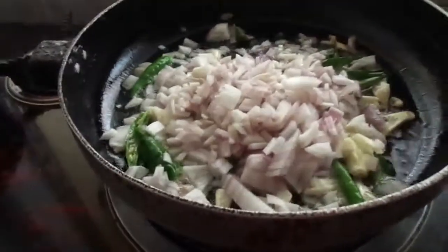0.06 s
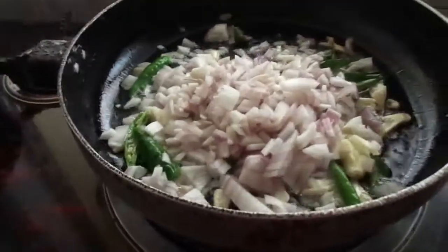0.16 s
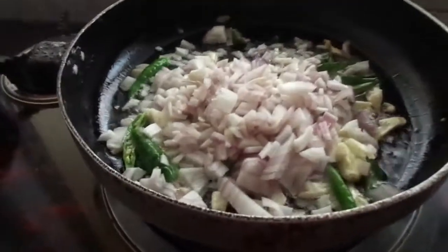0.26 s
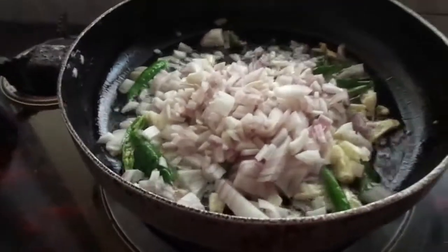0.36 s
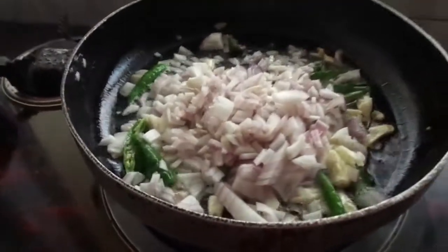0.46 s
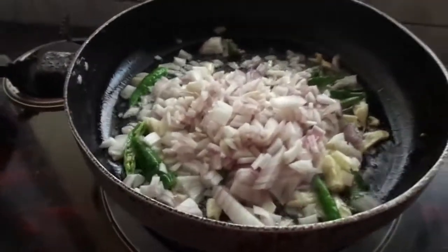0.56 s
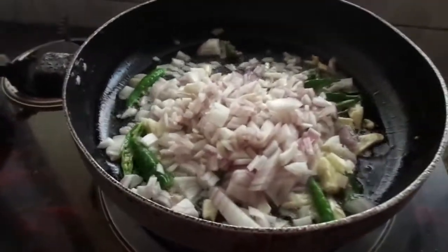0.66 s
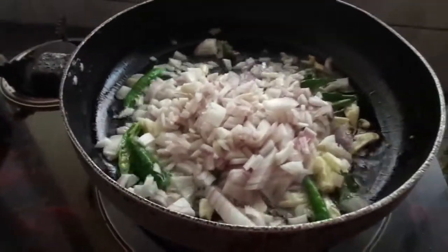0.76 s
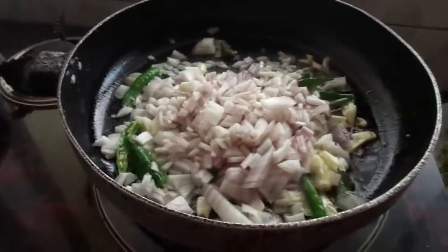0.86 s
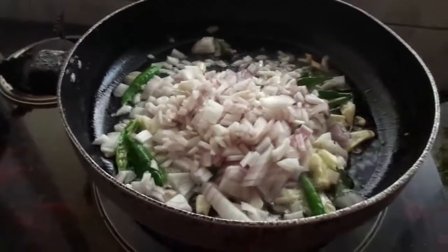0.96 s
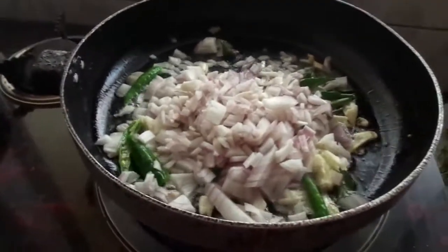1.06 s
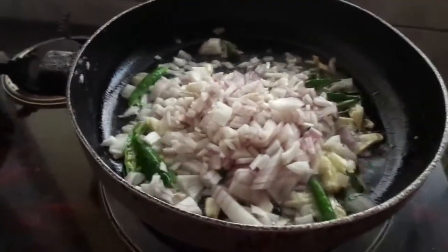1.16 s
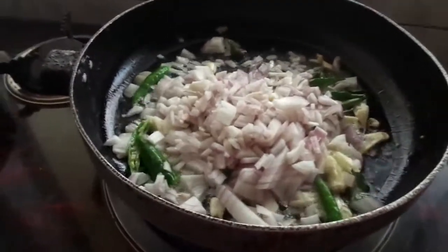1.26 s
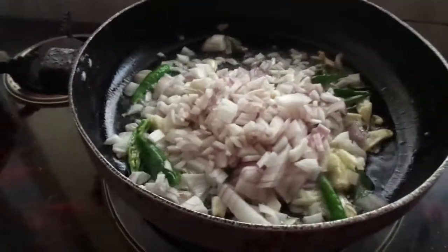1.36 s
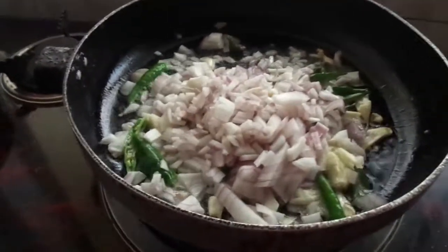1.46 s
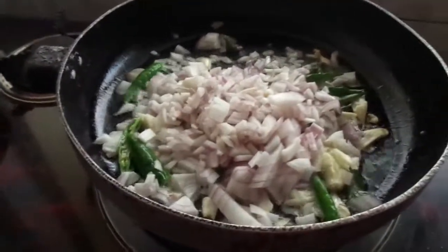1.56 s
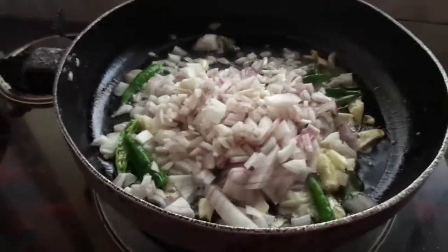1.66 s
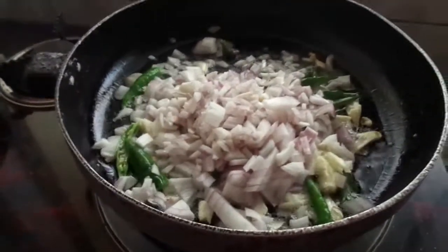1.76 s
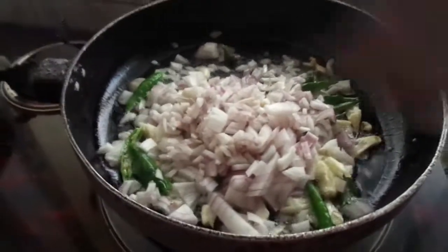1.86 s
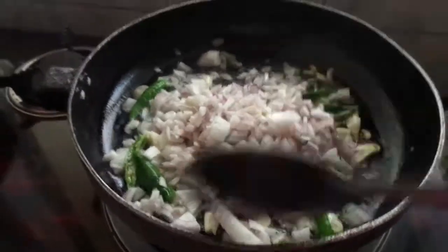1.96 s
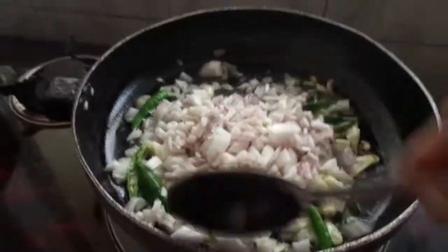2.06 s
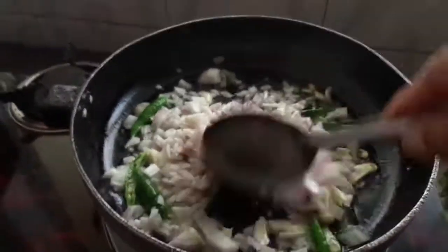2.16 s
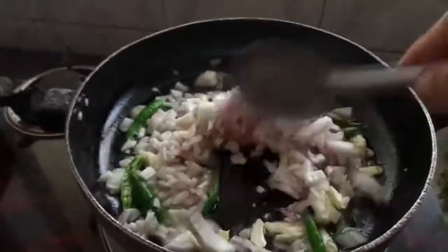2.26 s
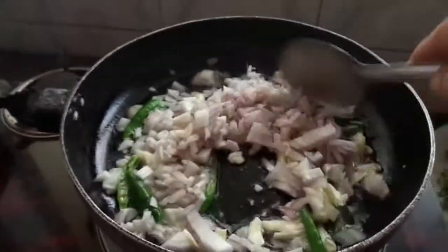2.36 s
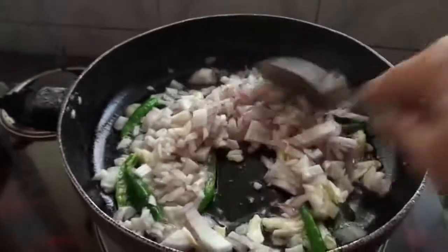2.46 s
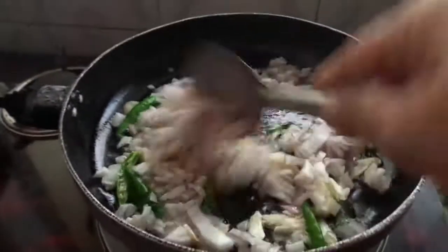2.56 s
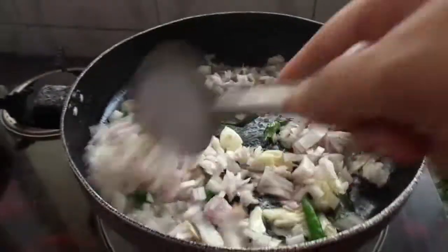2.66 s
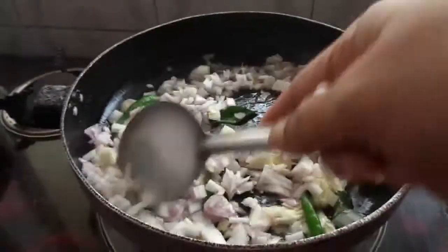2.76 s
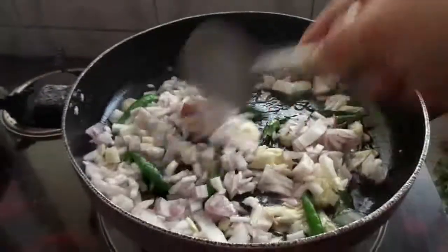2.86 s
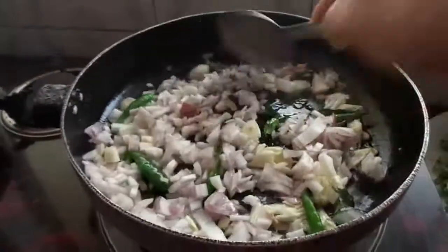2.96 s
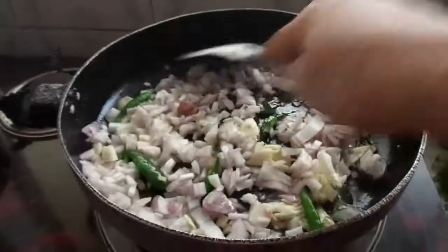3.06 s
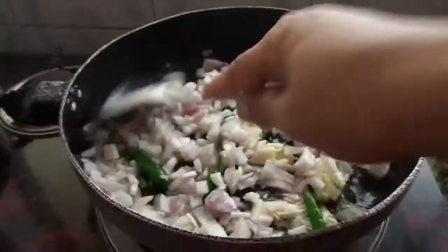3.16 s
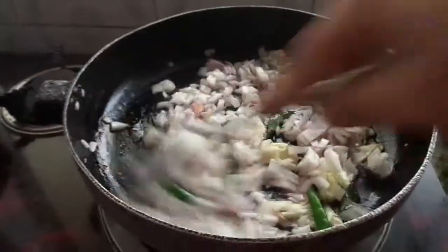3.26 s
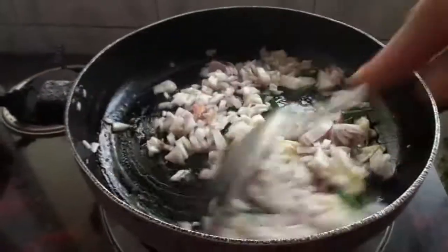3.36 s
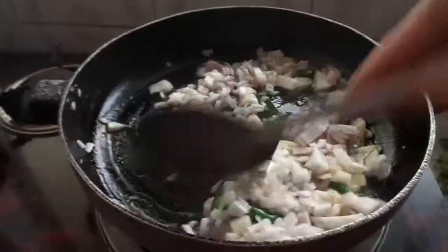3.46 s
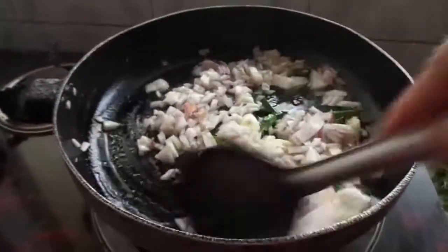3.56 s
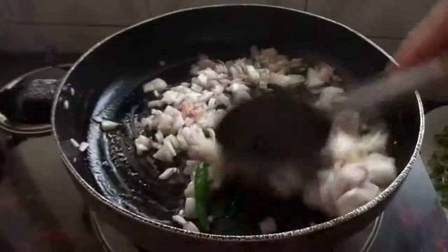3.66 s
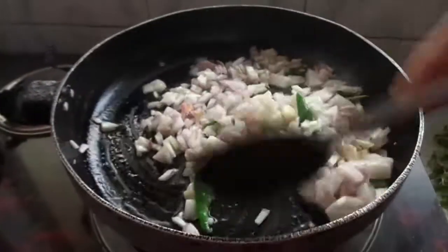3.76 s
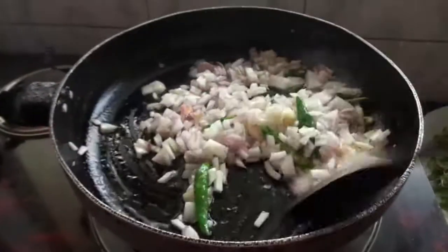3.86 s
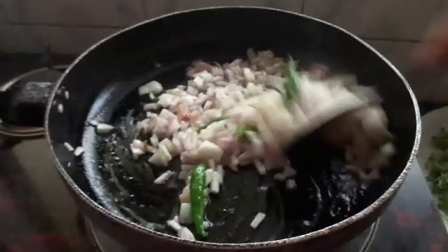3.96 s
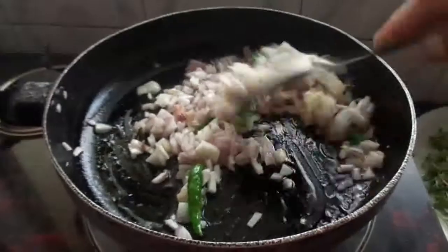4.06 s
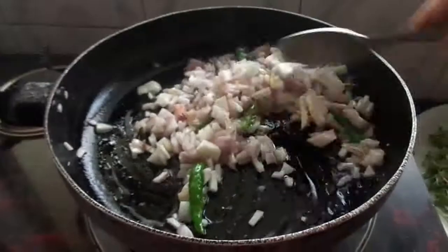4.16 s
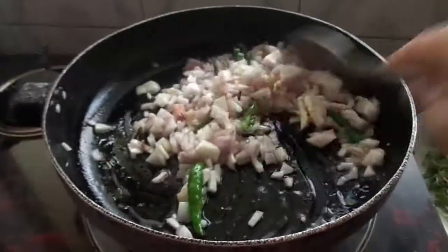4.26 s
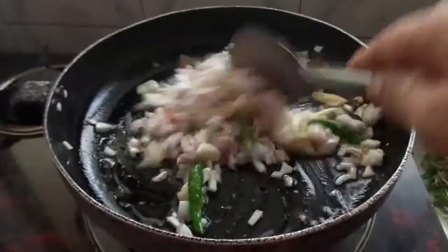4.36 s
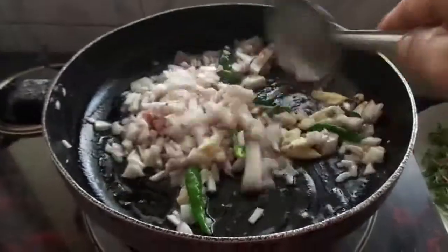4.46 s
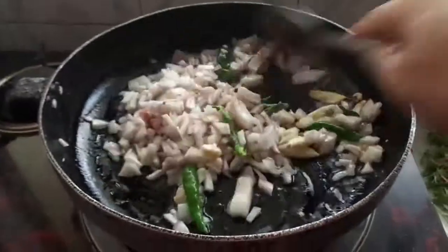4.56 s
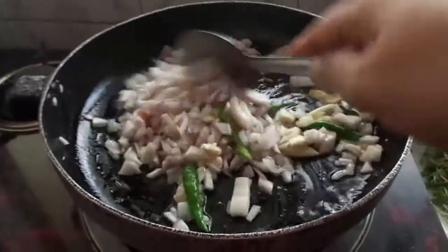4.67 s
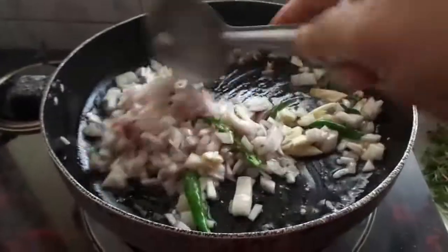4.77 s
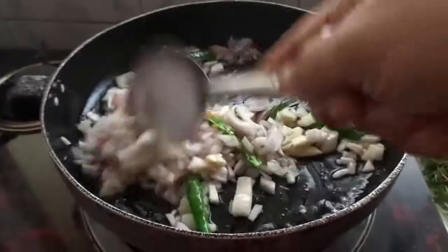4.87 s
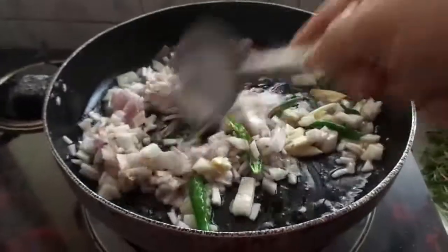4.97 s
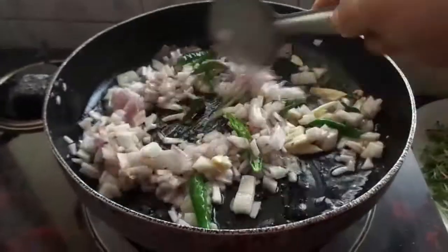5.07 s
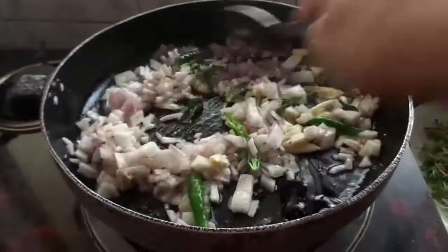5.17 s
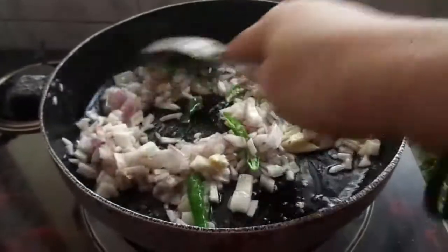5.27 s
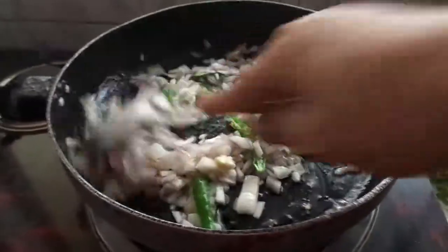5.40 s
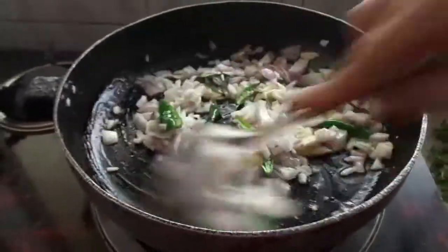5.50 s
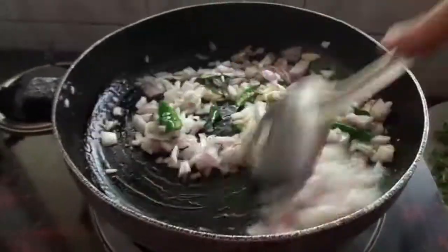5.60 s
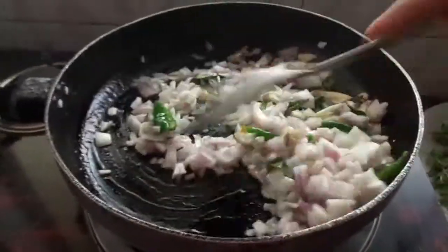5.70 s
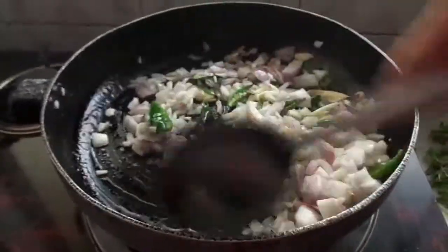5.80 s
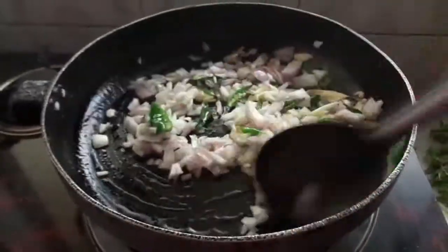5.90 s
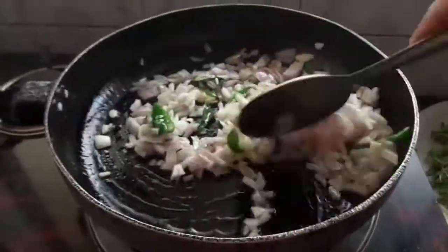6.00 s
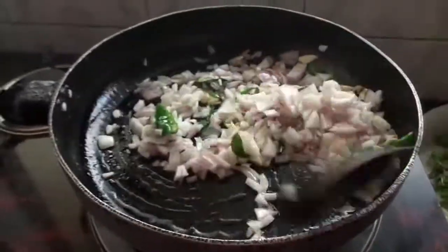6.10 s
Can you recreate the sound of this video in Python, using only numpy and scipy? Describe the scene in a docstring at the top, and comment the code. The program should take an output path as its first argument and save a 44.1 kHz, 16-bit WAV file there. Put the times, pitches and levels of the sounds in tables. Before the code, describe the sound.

From the start, a fine, bright sizzle of onions in hot oil fills the close foreground, with random crackles and sharp drops spitting, notably at 0.2, 0.8 and 1.4 s. Wet pieces slump softly near 0.4 and 1.1 s, with faint trembling steam tones. At 1.2 s a thin steel clink skids and rings briefly. A light ladle tap with a tiny squeak comes at 2.1 s, then a soft scrape at 2.5 s as the sizzle rises. A hard knock at 3.0 s leads into scraping; ringing knocks and gritty strokes follow at 3.5 and 3.8 s. The strongest, raspy stroke lands at 4.6 s, between sharp spits. Knocks at 5.2 and 5.3 s, a squeaky drag to 5.6 s, then softer strokes at 5.8 and 6.1 s with sizzling flares. Low hum, faint rumble and a short kitchen tail lie underneath.

```python
"""A fine, crackling sizzle up close: chopped onions fry in hot oil in a small kitchen.
Random clicks and noise make the sizzle of steam bursts; short snaps make single drops spit.
A steel utensil clinks once, as a skid of noise and dying sines. A ladle knocks on the pan (thud and
ringing modes) and scrapes through the onions (slips that ring it); the stirred oil sizzles harder.
Soft rustles, brief squeaks, a faint rumble and a low hum lie underneath, with a short room tail."""
import sys
import numpy as np
from scipy import signal
from scipy.io import wavfile
from scipy.ndimage import uniform_filter1d

SR = 44100
rng = np.random.default_rng(int(sys.argv[2]) if len(sys.argv) > 2 else 0)


def digitize_waveform(pressure):
    """Quantize a signal to 16-bit integers and store it at the path in sys.argv[1].

    Rows of a 2-D input are taken as channels; values are limited to [-1, 1].
    """
    field = np.atleast_2d(pressure).T
    bounded = np.clip(field, -1, 1)
    quanta = np.round(bounded * 32767).astype(np.int16)
    wavfile.write(sys.argv[1], SR, quanta)


N = 270641
TIME = np.arange(N) / SR
HIT_TIME = np.arange(SR // 2) / SR  # time axis of one short sound (s)


def amp(db):
    """Turns dB into a linear gain."""
    return 10 ** (np.asarray(db) / 20)


def unit(x):
    """Scales to rms 1."""
    return x / np.sqrt(np.mean(x ** 2) + 1e-20)


def read(points, hz):
    """Reads a spectrum on a log-frequency axis."""
    f, value = np.transpose(points)
    return np.interp(np.log(hz + 1), np.log(f + 1), value)


def follow(rows):
    """Gain over time from (s, dB) rows."""
    return amp(np.interp(TIME, *np.transpose(rows)))


def add(mix, s, sound):
    """Mixes a sound in at time s."""
    part = mix[max(round(s * SR), 0):][:len(sound)]
    part += sound[:len(part)]


def impulse(points, size=2048):
    """The causal (minimum-phase) click that has a given spectrum."""
    log_gain = np.log(amp(read(points, abs(np.fft.fftfreq(size, 1 / SR)))))
    return np.fft.ifft(np.exp(np.conj(signal.hilbert(log_gain)))).real


def through(x, response):
    """Passes x through an impulse response."""
    return signal.oaconvolve(x, response)[:len(x)]


def butter(x, order, hz, kind):
    """Rolls x off beyond a cut-off frequency."""
    return signal.sosfilt(signal.butter(order, hz, kind, fs=SR, output="sos"), x)


def resonate(x, hz, width_hz):
    """One resonance of gain 1."""
    return signal.lfilter(*signal.iirpeak(hz, hz / width_hz, SR), x)


def waver(per_s):
    """Random wandering of rms 1: straight lines between per_s random values each second."""
    knots = rng.standard_normal(int(N / SR * per_s) + 2)
    return unit(np.interp(TIME * per_s, np.arange(len(knots)), knots))


def bursts(per_s, spread_db, limit):
    """Random clicks: many small, a few large."""
    size = amp(spread_db * np.minimum(rng.exponential(1, N), limit))
    return size * rng.choice([-1, 1], N) * (rng.random(N) < per_s / SR)


def swells(times, peak_s):
    """One swell per time, shape (times, N): it reaches 1 after peak_s and dies away."""
    age = np.maximum(TIME - np.array(times)[:, None], 0) / peak_s
    return age * np.exp(1 - age)


def ring(modes, hold=1, shape=1):
    """Dying sines; hold scales their ring time and shape their strengths."""
    hz, db, t60 = np.transpose(modes)[:, :, None]
    decay = amp(db - 60 * HIT_TIME / (t60 * hold))
    return (shape * decay * np.sin(2 * np.pi * hz * HIT_TIME)).sum(0)


# how hard the oil fries, calm under the resting heap and livelier once stirred:
# t/s, level/dB (before the sizzle's trim)
FRYING_LEVEL = [(0, -38.5), (.27, -38), (.5, -41.5), (.85, -39), (1.35, -39), (2.05, -41), (2.3, -37.5),
                (2.8, -36), (3.2, -36.5), (4.35, -35), (4.95, -36.5), (5.25, -35), (5.8, -37),
                (6.13, -37.5)]
# colour of the sizzle: f/Hz, level per Hz/dB
SIZZLE_COLOUR = [(50, -28), (150, -28), (300, -8.5), (600, -1), (900, 0), (1170, 1.5), (1350, 7),
                 (1560, 3.5), (2400, 1), (3800, 2.5), (6000, 1), (9000, 0), (12400, 0)]


def sizzle():
    """Steam bubbles burst: a fine fizz, short pitched ticks and broad crackles, all in little flurries."""
    ticks = np.zeros(N)
    for hz in np.geomspace(1200, 12000, num=16):
        clicks = bursts(per_s=110, spread_db=4.5, limit=5.02)
        ticks += unit(resonate(clicks, hz, width_hz=hz * 0.34)) * np.sqrt(hz)
    crackles = bursts(per_s=1500, spread_db=1, limit=5.4)
    fizz = rng.standard_normal(N)
    oil = amp(-5.5) * unit(ticks) + amp(-6.5) * unit(crackles) + amp(-0.5) * fizz
    flurries = amp(0.65 * waver(per_s=110) + 0.97 * waver(per_s=16))
    oil = through(oil * flurries, impulse(SIZZLE_COLOUR))
    trim_db = 4.0
    return amp(trim_db) * follow(FRYING_LEVEL) * flares() * unit(oil)


def flares():
    """A stroke wipes wet onion over bare hot metal: the sizzle flares (dips if negative) and settles."""
    start, *_, flare_db = np.transpose(STROKES)
    return amp(flare_db @ swells(start, peak_s=0.074))


# colour of the wet rustle: f/Hz, level per Hz/dB
RUSTLE_SPECTRUM = [(50, -40), (150, -25), (350, -6.5), (650, -1.5), (950, -5), (1350, -2.5), (2300, -1.5),
                   (4000, -0.5), (7000, -6.5), (12000, -34)]
# wet onions slump or tumble: t of the peak/s, level/dB, settling time constant/s
ONION_TUMBLES = [(.44, -41, 0.41), (1.07, -40, 0.078), (2.2, -38.5, 0.08), (2.55, -41, 0.096),
                 (3.3, -49, 0.62), (4.05, -46, 0.68), (4.78, -44.5, 0.4), (5.55, -45, 0.26)]


def rustle():
    """Wet pieces slide over each other with soft, dull crackles."""
    rise_s, resting_db = 0.12, -50  # a tumble builds up quickly; in between the heap barely stirs
    grains = bursts(per_s=2500, spread_db=1.0, limit=4.7) * amp(0.92 * waver(per_s=45))
    power = amp(resting_db) ** 2
    for s, db, settle_s in ONION_TUMBLES:
        away = np.maximum((s - TIME) / rise_s, (TIME - s) / settle_s)
        power = power + (amp(db) * np.exp(-away)) ** 2
    return np.sqrt(power) * unit(through(grains, impulse(RUSTLE_SPECTRUM)))


def trembling_tones(rows, unsteady):
    """Brief tones that swell and fade while their pitch trembles."""
    out = np.zeros(N)
    drift = unsteady * waver(per_s=350)
    for s, length, db, hz in rows:
        span = abs(TIME - s) < .08
        swell = np.exp(-((TIME[span] - s) / length) ** 2)
        turns = np.cumsum(hz * (1 + drift[span])) / SR
        out[span] += amp(db + 3.0) * swell * np.sin(2 * np.pi * turns)  # a sine peaks 3 dB above its rms
    return out


# steam under the onions: t of the peak/s, half-length/s, rms level at the peak/dB, f/Hz
STEAM_WHISTLES = [(.44, .025, -47.5, 604), (1.05, .01, -40, 2350), (1.172, 0.013, -41, 2980)]


def steam():
    """Steam squeezes out from under the wet onions as faint, trembling tones."""
    return trembling_tones(STEAM_WHISTLES, unsteady=.06)


# what the pan rings with: f/Hz, level/dB, undamped t60/s
PAN_MODES = [(269.9, -25, 0.54), (332, -20, 0.27), (378, -16, 0.042), (520, -42, .07), (574.2, -9.5, 0.27),
             (657, -8, 0.13), (863, -19.5, 0.17), (962, -12, 0.078), (1106, -4.5, 0.033),
             (1189, -9.5, 0.16), (1280, -5, 0.12), (1380, -4.5, 0.15), (1500, -8, 0.044), (1778, -9, .06),
             (1902, -11.5, 0.12), (2070, -16.5, 0.037), (2500, -24, 0.105), (2790, -19, 0.13),
             (3370, -10, 0.12), (4500, -31, 0.082), (5060, -15, 0.077), (7070, -7.5, 0.085)]


def pan_ring(hold, spread_db):
    """Neighbouring modes swing against each other; their strengths vary randomly from ring to ring."""
    order = np.arange(len(PAN_MODES))[:, None]
    strengths = amp(spread_db * rng.standard_normal(order.shape))
    return ring(PAN_MODES, hold, (-1) ** order * strengths)


# drops of oil that spit: t/s, snap level/dB, centre f/Hz
OIL_SPITS = [(.034, -13, 7300), (.136, -18.5, 2300), (.205, -7, 4500), (.387, -17, 4970),
             (0.4759, -10, 7360), (.797, -9, 5400), (1.044, -18, 2200), (1.309, -19, 1700),
             (1.44, -9, 8600), (1.68, -16.5, 2580), (1.718, -14.5, 3140), (1.76, -14, 7500),
             (1.78, -17, 6000), (2.257, -13.5, 9000), (2.7706, -8.5, 7700), (3.31, -12, 5000),
             (3.7776, -12, 2600), (4.003, -9.5, 8000), (4.28, -10.5, 3500), (4.349, -12.5, 5000),
             (4.526, -4, 6000), (4.699, -12, 8000), (4.745, -3, 6850), (5.721, -13, 8000)]


def spits():
    """A drop bursts with one sharp snap, a hollow pop and a little spray, and faintly rings the pan."""
    out, t = np.zeros(N), HIT_TIME
    # the steam pocket behind each snap
    pop_hz, pop_db, pop_s = 1560, -18.5, .0011
    pop = amp(pop_db) * np.sin(2 * np.pi * pop_hz * t) * np.exp(-t / pop_s)
    for s, db, hz in OIL_SPITS + small_spits(count=22):
        snap = np.cos(2 * np.pi * hz * t) * np.exp(-t * hz / 1.15)  # dies within a few cycles
        spray = amp(-14) * rng.standard_normal(len(t)) * np.exp(-t / .0014)
        pan = amp(-28.5) * pan_ring(hold=0.33, spread_db=3.5)
        add(out, s, amp(db) * (snap + pop + spray + pan))
    return butter(out, 2, 450, "highpass")


def small_spits(count):
    """Lesser drops at random moments: rows of t/s, snap level/dB, centre f/Hz."""
    when, size, pitch = rng.random((count, 3)).T
    level_db = np.interp(size, (0, 1), (-22, -19.5))
    centre_hz = np.interp(pitch, (0, 1), (2200, 10500))
    return list(zip(when * (N - 1) / SR, level_db, centre_hz))


# colour of the thud: f/Hz, level per Hz/dB
THUD_COLOUR = [(40, -49), (120, -39), (250, -10), (600, 0.5), (850, -1.5), (1300, 6.5), (2000, 1.5),
               (3200, -3), (5000, -4.5), (7500, -28)]
# the ladle hits the pan: t/s, thud level/dB and ring level/dB (both before trim), hardness as cut-off f/Hz,
# ring time/factor, strongest resonance f/Hz, its boost/factor
LADLE_KNOCKS = [(2.106, -11.5, -21.5, 2500, 0.55, 1150, .4), (3.0299, 0, -16.5, 3370, 0.43, 1490, 0.98),
                (3.0361, -13, -26, 2800, 0.31, 1400, 0.46), (3.4798, -9.5, -12.5, 5960, 1, 550, 0.63),
                (3.8075, -15.5, -20.5, 3200, .6, 1300, .3), (4.579, 0, -17, 4850, 0.63, 1280, 0.45),
                (4.5805, -14, -18, 4200, 0.46, 2630, .6), (5.199, -10.5, -20.5, 2190, 0.53, 1450, 0.43),
                (5.324, -0.5, -15.5, 2520, 0.27, 1560, 0.8), (5.3269, -29, -13.5, 2200, 0.22, 580, 1.8),
                (5.8151, -25, -23.5, 2000, 1, 1380, 1.2), (6.0967, -11.5, -19, 2800, 1., 1420, 1)]


def knocks():
    """A blow gives a short thud and rings the pan; the ladle and the food damp the ring."""
    out, t = np.zeros(N), HIT_TIME
    thud_trim_db, ring_trim_db = 2.5, -1.0
    thud = impulse(THUD_COLOUR)
    thud = thud / abs(thud).max()
    for s, thud_db, ring_db, cut_hz, hold, main_hz, boost in LADLE_KNOCKS:
        # the edge rattles on the metal
        chatter = amp(-21.5) * rng.standard_normal(len(t)) * np.exp(-t / 0.0068)
        blow = amp(thud_db + thud_trim_db) * through((t == 0) + chatter, thud)
        hit = blow + amp(ring_db + ring_trim_db) * pan_ring(hold, spread_db=0.5)
        hit = hit + boost * resonate(hit, main_hz, width_hz=160)
        add(out, s, butter(hit, 2, cut_hz, "lowpass"))
    return out


# colours of the grating, the low shudder, the dry rasp and the deepest modes, each: f/Hz, level/dB
GRATE_COLOUR = [(100, -50), (600, -28.5), (950, -1.5), (1350, 2.5), (1700, 1.5), (2400, -16), (4000, -34)]
SHUDDER_COLOUR = [(60, -49), (300, -18.5), (490, -1.5), (680, 11.5), (900, 7), (1200, -32)]
RASP_COLOUR = [(1000, -24.5), (1500, -13.5), (1950, 14), (3000, 2.5), (4200, -1.5), (6000, -3),
               (10000, -37)]
DEEP_COLOUR = [(40, -46), (80, -21), (200, -26), (270, 4.5), (400, 4.5), (520, -15), (900, -58)]
# strokes of the ladle over the pan floor: start t/s, length/s, rise/s, fade/dB per s, grating level/dB,
# shudder level/dB, rasp level/dB, share of shudder power in the deepest modes, flare of the sizzle/dB
STROKES = [ (2.457, 0.066, .033, 250, -35.5, -38, -44, .03, 0.2),
           (3.028, 0.098, 0.0037, 150, -33, -29.5, -29, .08, 0.6),
           (3.083, 0.242, 0.077, 65, -30, -39.5, -32.5, 0.036, -0.3),
           (3.48, .17, 0.0022, 150, -23.5, -30.5, -32.5, .3, 1.5),
           (3.805, 0.13, 0.034, 85, -23, -31.5, -28.5, 0.46, 1.5),
           (3.912, 0.082, 0.016, 40, -29.5, -34.5, -35, .08, 0.2),
           (4.58, 0.087, 0.016, 230, -20.5, -29, -21.5, 0.15, 2),
           (5.332, .1, .004, 132, -30, -32, -30, .28, -0.8),
           (5.398, 0.18, 0.064, 90, -27.5, -38, -29.5, 0.036, 1),
           (5.813, 0.13, 0.0055, 50, -31.5, -33.5, -37, 0.47, 2.5),
           (6.095, 0.084, 0.0085, 130, -26, -33, -28, 0.38, 3)]


def scrapes():
    """The ladle sticks and slips, ringing the damped pan; each stroke bites, eases and lifts off."""
    out = np.zeros(N)
    lift_s = 0.036  # the ladle leaves the metal
    shudder_fade, rasp_fade = 0.6, 0.94  # these fade more slowly than the grating (factors)
    slips = bursts(per_s=2400, spread_db=0.5, limit=4.0) * amp(0.74 * waver(per_s=200))
    body = pan_ring(hold=0.83, spread_db=0)
    body[0] += amp(26.5)  # the bare friction at the edge itself
    bend = .03 * waver(per_s=35)  # the moving load pulls the modes up and down
    bent_time = TIME + np.cumsum(bend - bend.mean()) / SR
    rung = np.interp(bent_time, TIME, through(slips, body))
    bands = []
    for colour in (GRATE_COLOUR, SHUDDER_COLOUR, RASP_COLOUR, DEEP_COLOUR):
        band = through(rung, impulse(colour))
        local_power = abs(uniform_filter1d(band ** 2, size=1100))
        bands.append(band / np.sqrt(local_power + 1e-12))  # the hand presses evenly
    grate, shudder, rasp, deep = bands
    for s, length, rise_s, fade, grate_db, shudder_db, rasp_db, share, _ in STROKES:
        on = (TIME >= s) & (TIME <= s + length)
        t = TIME[on] - s
        contact = np.sqrt(np.minimum(t / rise_s, 1)) * np.clip((length - t) / lift_s, 0, 1)
        eased_db = fade * np.maximum(t - rise_s, 0)
        low = np.sqrt(1 - share) * shudder[on] + np.sqrt(share) * deep[on]
        stroke = amp(grate_db - eased_db) * grate[on]
        stroke += amp(shudder_db - shudder_fade * eased_db) * low
        stroke += amp(rasp_db - rasp_fade * eased_db) * rasp[on]
        out[on] += contact * stroke
    return out


# the pan sings under the ladle: t of the peak/s, half-length/s, rms level at the peak/dB, f/Hz
LADLE_SQUEAKS = [(2.107, 0.0022, -12, 1262), (2.494, 0.013, -34, 1000), (3.119, 0.0082, -27, 2120),
                 (3.186, 0.0026, -18, 1380), (3.556, 0.0049, -24, 1280), (3.838, 0.013, -25, 1890),
                 (3.857, .005, -23, 1390), (3.957, 0.0072, -24, 1187), (3.954, 0.018, -29.5, 645),
                 (4.597, 0.0066, -17, 1263), (4.618, .006, -18.5, 1159), (5.449, .009, -25, 1350),
                 (5.496, 0.0087, -19, 1367), (5.515, .015, -25, 1320), (5.822, 0.0066, -18, 1370),
                 (6.113, 0.011, -20, 1357)]


def squeaks():
    """The ladle's edge catches and the pan sings briefly, with a trembling pitch."""
    return trembling_tones(LADLE_SQUEAKS, unsteady=0.026)


# what the steel utensil rings with: f/Hz, level/dB, t60/s
STEEL_MODES = [(1893, 3.5, 0.14), (2500, -11, .1), (3384, -3.5, 0.15), (4530, -10, 0.17),
               (4780, -3.5, 0.16), (5170, -7, .15), (7080, -2, 0.26), (7280, -7, .22), (7843, -6, 0.21),
               (9220, 1, .21), (9650, -11, .1), (11540, -5, .11), (11690, -3, 0.1)]
# its touches: t/s, level/dB, skid decay time/s, ring level against the skid/dB
STEEL_CLINKS = [(1.2145, -25, 0.012, -9.5), (1.2242, -29.5, 0.043, .5)]


def clink():
    """Steel touches steel, skids for a moment and rings on."""
    out, t = np.zeros(N), HIT_TIME
    for s, db, skid_s, ring_db in STEEL_CLINKS:
        skid = resonate(rng.standard_normal(len(t)), 5500, width_hz=16000) * np.exp(-t / skid_s)
        add(out, s, amp(db) * (skid + amp(ring_db) * ring(STEEL_MODES)))
    return out


# the pan on its burner: f/Hz, level per Hz/dB
ROCKING_COLOUR = [(25, -18), (55, -9), (85, 3), (130, -7), (220, -10), (500, -42)]


def rocking():
    """Each knock sets the pan rocking on its burner with a faint rumble."""
    rumble = unit(through(rng.standard_normal(N), impulse(ROCKING_COLOUR, size=8192)))
    after_knocks = swells([row[0] for row in LADLE_KNOCKS], peak_s=0.14).max(0)
    return amp(-64) * after_knocks * rumble


# stove and kitchen hum: f/Hz, level per Hz/dB
HUM_COLOUR = [(20, -15), (58, -18), (78, -12), (95, -2), (140, 2), (200, 1), (300, 0), (500, -3),
              (1000, -16), (3000, -50)]


def hum():
    """Low rush of the stove and the room: filtered noise whose level wavers gently."""
    rush = unit(through(rng.standard_normal(N), impulse(HUM_COLOUR, size=8192)))
    return amp(-56.0) * rush * amp(1.2 * waver(per_s=7.4))


# how long the room rings: f/Hz, t60/s
KITCHEN_DECAY = [(200, 0.53), (1500, 0.17), (5000, 0.034), (12000, 0.56)]


def kitchen(x):
    """Tiled walls give a short noise tail that dies fastest around 5 kHz."""
    hz, t, z = signal.stft(rng.standard_normal(SR // 2), SR, nperseg=256)
    decay = amp(-60 * t / read(KITCHEN_DECAY, hz)[:, None])
    tail = signal.istft(z * decay, SR, nperseg=256)[1]
    tail[:round(.004 * SR)] = 0  # a short gap before the walls answer
    return through(x, tail / np.linalg.norm(tail))


def scene():
    """Everything sounds from one spot, so both ears hear nearly the same."""
    oil = sizzle() + rustle() + steam()
    low = hum() + rocking()
    ladle = knocks() + scrapes() + squeaks()
    near = oil + spits() + ladle + clink()
    mid = near + amp(-7.5) * kitchen(near) + low
    side = amp(-38.5) * kitchen(oil + low)
    return np.array([mid + side, mid - side])


def record(dry):
    """The hardest knocks overload the microphone; the recorder thins the deep bass and limits the band."""
    thin = butter(np.clip(dry, -.95, .95), 1, 60, "highpass")
    band_edge_hz = 12560
    edge = signal.firwin(401, band_edge_hz, window=("kaiser", 8), fs=SR)
    return signal.oaconvolve(thin, edge[None], "same")


dry = scene()
out = record(dry)
digitize_waveform(out)
```